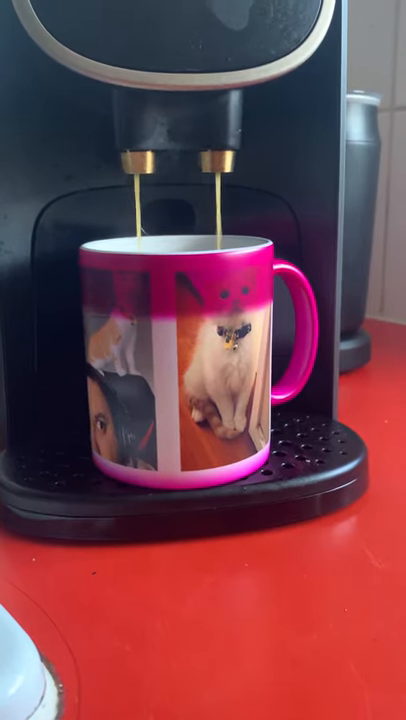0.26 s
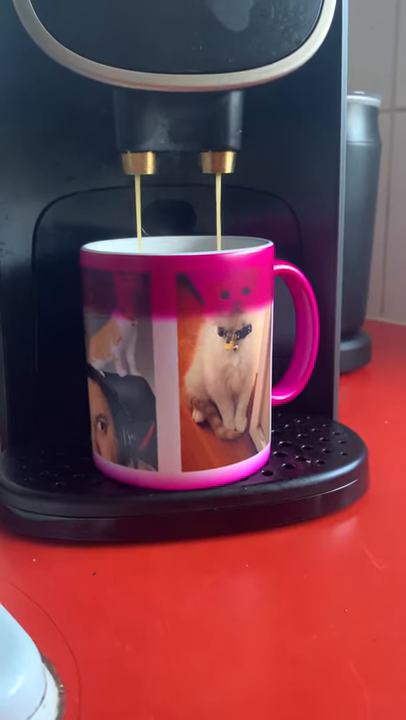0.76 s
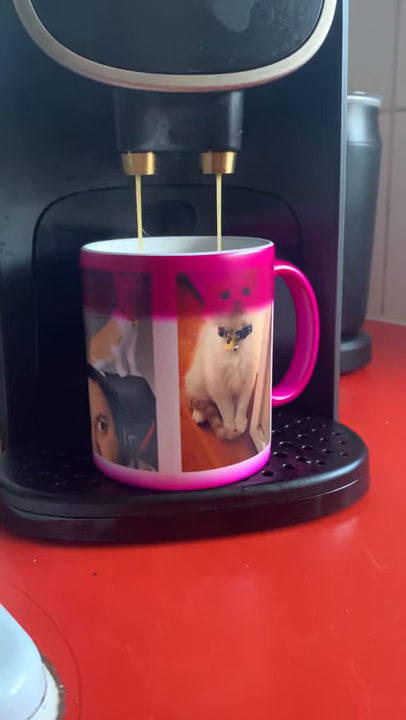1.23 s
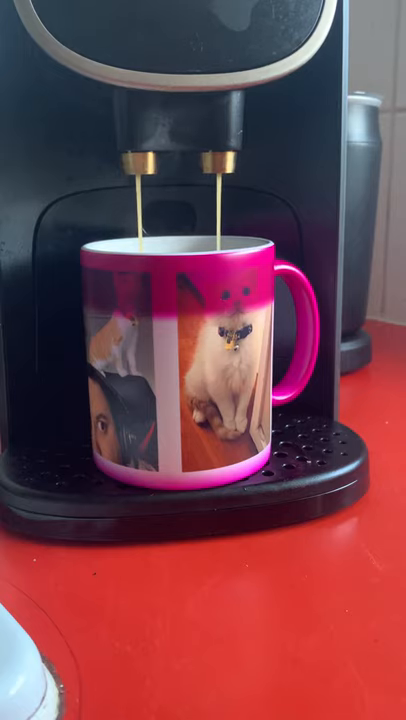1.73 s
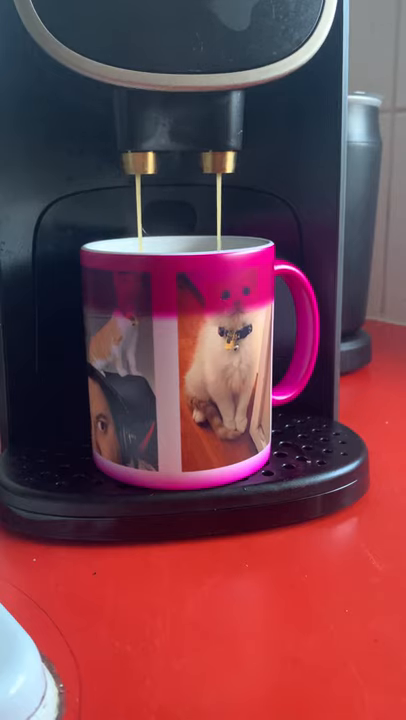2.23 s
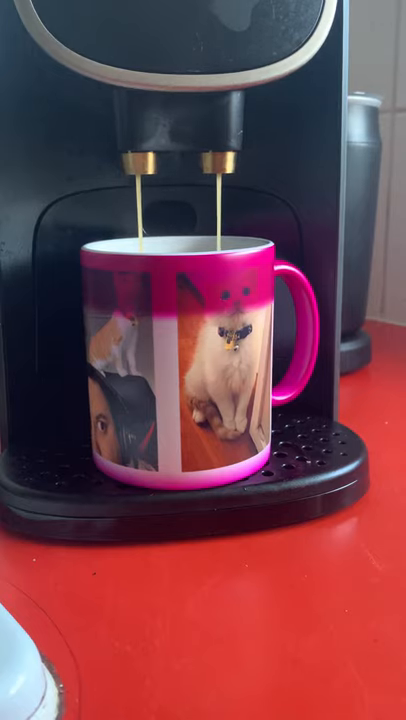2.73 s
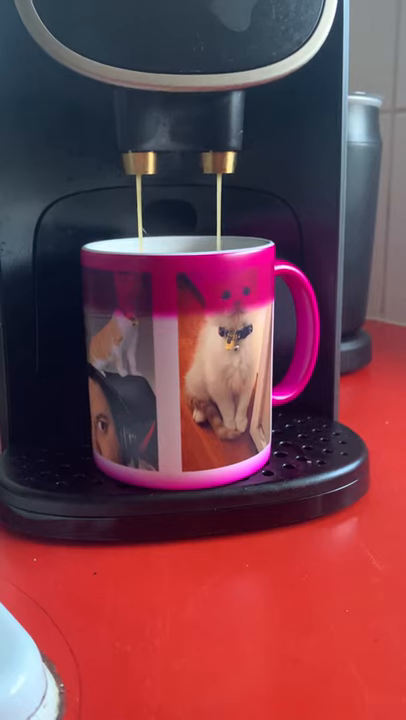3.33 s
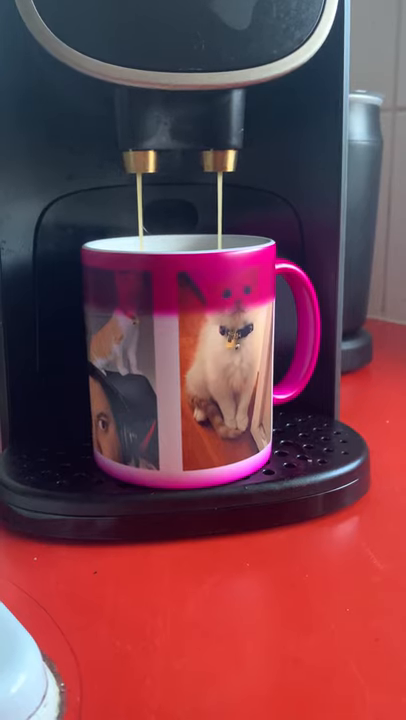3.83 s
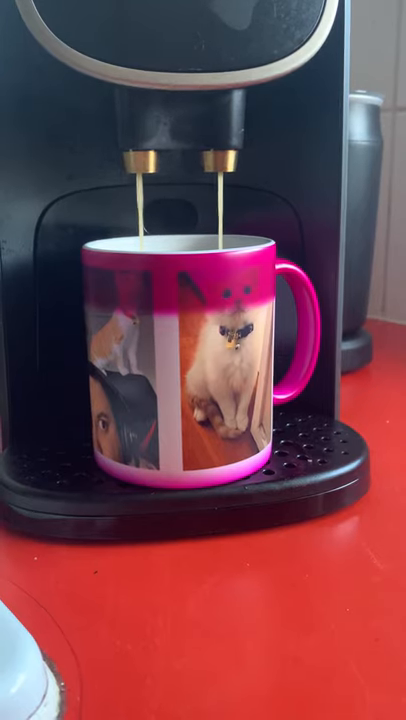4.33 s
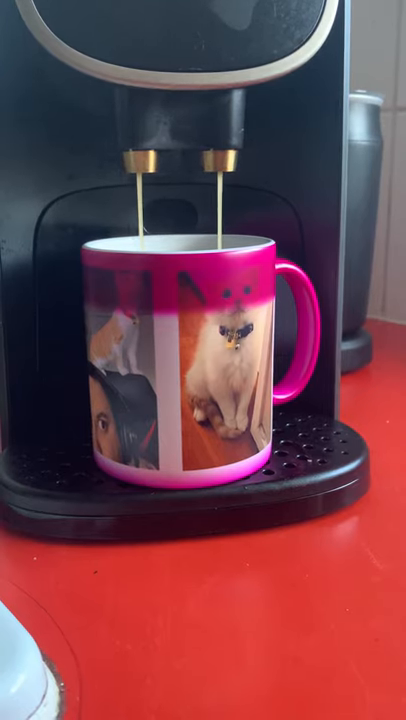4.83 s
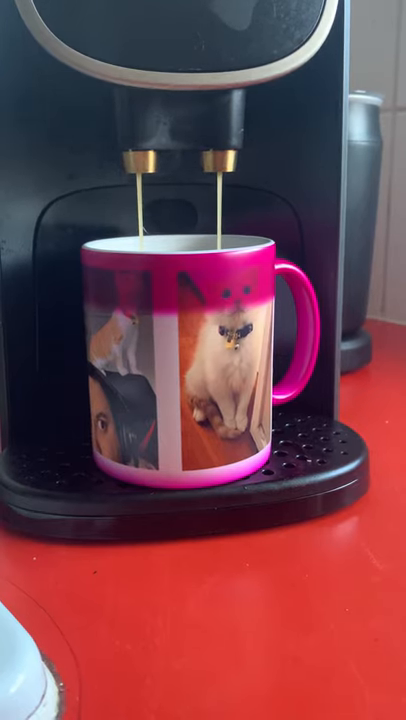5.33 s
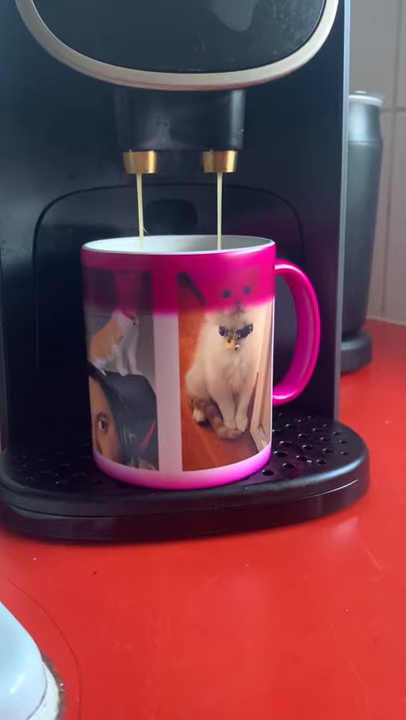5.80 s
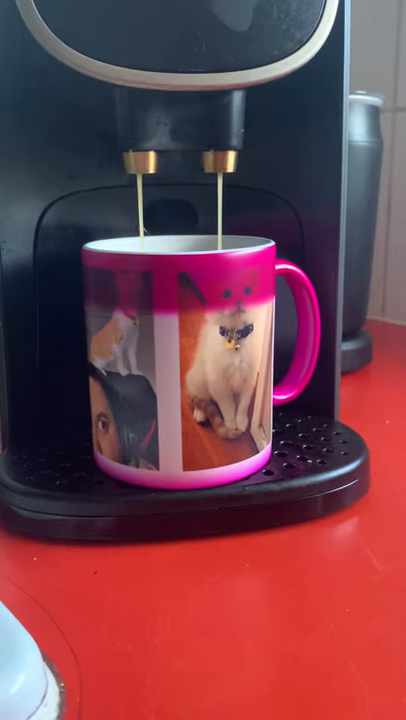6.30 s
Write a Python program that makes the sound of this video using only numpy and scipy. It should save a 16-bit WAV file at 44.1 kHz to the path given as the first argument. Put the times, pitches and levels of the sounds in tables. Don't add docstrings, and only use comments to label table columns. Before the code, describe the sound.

A coffee machine's vibrating pump hums and buzzes steadily with sharp rapid clacking, later rattling its drip tray, while coffee trickles into a mug.

```python
import sys
import numpy as np
from scipy import signal
from scipy.fft import rfft, irfft, next_fast_len
from scipy.io import wavfile
from scipy.ndimage import map_coordinates

SR = 44100
rng = np.random.default_rng(int(sys.argv[2]) if len(sys.argv) > 2 else 0)


def ratio_of_db(decibels):
    return 10 ** (np.asarray(decibels, float) / 20)


def wav_out(sig):
    wavfile.write(sys.argv[1], SR, np.round(np.clip(np.atleast_2d(sig).T, -1, 1) * 32767).astype(np.int16))


N = 289296
TIME = np.arange(N) / SR
MAINS_HZ = 49.963
SIDES = np.array([[1], [-1]])
BOUNCE_FROM_S = 3.97


def unit(x):
    return x / np.sqrt(np.mean(x ** 2) + 1e-20)


def along(points, hz):
    f, v = np.transpose(points)
    return np.interp(np.log(hz + 1), np.log(f + 1), v)


def wobble(rate):
    knots = rng.standard_normal(int(N * rate / SR) + 4)
    return map_coordinates(knots, [TIME * rate])


def shape(start, attack, hold, release):
    end = start + attack + hold + release
    return np.clip(np.minimum((TIME - start) / attack, (end - TIME) / release), 0, 1)


def filtered(x, response):
    m = 2 * next_fast_len(N // 2 + SR // 4)
    return irfft(rfft(x, m) * response(np.fft.rfftfreq(m, 1 / SR)), m)[..., :N]


def causal(gain):
    c = irfft(np.log(gain + 1e-6))
    half = len(c) // 2
    return np.exp(rfft(np.r_[c[0], 2 * c[1:half], c[half], np.zeros(half - 1)]))


def ringing(modes, f):
    return np.sqrt(sum(ratio_of_db(2 * db) / (1 + (2 * (f - c) / w) ** 2) ** 2 for c, w, db in modes))


def strokes(start, sizes, jitter):
    n = np.arange(-2, int(N / SR * MAINS_HZ) + 1)
    at = (start + n / MAINS_HZ + jitter * rng.standard_normal(len(n))) * SR
    keep = (at >= 0) & (at < N - 1)
    at, size = at[keep], sizes(n)[keep]
    whole = at.astype(int)
    part = at - whole
    return np.bincount(whole, size * (1 - part), N) + np.bincount(whole + 1, size * part, N)


def scatter(db):
    return lambda n: ratio_of_db(db * rng.standard_normal(len(n)))


def ports(f):
    # frequency in Hz, lead of the left port in radians
    port_lead = [(900, 0.71), (1100, 3), (1500, 0.69), (1950, 1.1), (2200, 1.944), (3100, 2.36),
                 (3450, 2.04), (4000, 1.22), (4800, 2.35), (6500, 4.87), (7500, 6), (9500, 6.99),
                 (12500, 9.62), (14100, 10), (14700, 11.9), (15500, 11)]
    return np.exp(.5j * SIDES * along(port_lead, f))


def kitchen():
    # time in seconds, pitch in Hz
    engine_pitch = [
        (0, 58.5),
        (1.6, 55.5),
        (3.0, 51.2),
        (5.45, 50.5),
        (5.63, 56),
        (6.56, 55.8),
    ]
    # start in seconds, length in seconds, level in dB
    swells = [
        (.05, 0.9, -52),
        (1.05, 1, -48.5),
        (2.27, 0.22, -52),
        (2.65, .29, -51),
        (3.122, .33, -68),
        (3.62, 0.35, -59),
        (4.15, .18, -64),
        (5.47, 1, -57),
        (6.45, .2, -63),
    ]
    # frequency in Hz, density in dB per Hz
    hiss_spectrum = [(30, -11), (100, -7), (300, -11), (600, -23), (1500, -20), (3000, -22.5),
                     (6000, -20.5), (13000, -30.5), (16000, -31.5)]
    edge_s, lull_db = 0.085, -78
    drone_hz = np.interp(TIME, *np.transpose(engine_pitch))
    heard = ratio_of_db(lull_db)
    for start, length, db in swells:
        heard = heard + ratio_of_db(db) * shape(start - edge_s / 2, edge_s, length - edge_s, edge_s)
    drone = np.sin(2 * np.pi * np.cumsum(drone_hz) / SR) * ratio_of_db(1.3 * wobble(4.2))
    alike, opposite = rng.standard_normal((2, N))
    opposite = filtered(opposite, lambda f: np.clip(f / 400, .05, 1))
    hiss = np.array([alike + opposite, alike - opposite])
    hiss = filtered(hiss, lambda f: ratio_of_db(along(hiss_spectrum, f)))
    return ratio_of_db(-4.0) * heard * unit(drone) + ratio_of_db(-50.5 + 1.37 * wobble(6)) * unit(hiss)


def panel(level_db):
    mode = lambda f: causal(ringing([(1491.5, 46.3, 0.025)], f)) * ports(f)
    return ratio_of_db(level_db + 1.5) * unit(filtered(strokes(0.014, scatter(0.57), jitter=2.5e-5), mode))


def tray(level_db):
    # frequency in Hz, width in Hz, level in dB
    tray_modes = [(78, 48, 0.5), (115, 55, -6), (210.3, 43, 7), (295, 36, 7), (251, 50, -1.5),
                  (425, 88, -12.5), (678, 36, -7), (821, 95, -8)]
    slip = np.cumsum(.02 * rng.standard_normal(400))
    sizes = lambda n: np.cos(2 * np.pi * (n / 3 + slip[n + 2])) + .1 * rng.standard_normal(len(n))
    response = lambda f: causal(ringing(tray_modes, f)) * np.exp(-.3j * SIDES)
    knock = filtered(strokes(0.003944, sizes, jitter=0.00023), response)
    return ratio_of_db(level_db - 5.0) * unit(knock)


def clack(level_db):
    # frequency in Hz, width in Hz, level in dB at first, midway and at the end
    casing = [(1750, 140, -16, -6.5, -2), (1920, 77, -7, -12.5, -11), (2567, 130, -0.5, 2.5, 2),
              (2810, 140, 1.5, -1, -2), (3485, 154, 0.5, -2, -5.5), (3986, 145, 5, 4.5, 3.5),
              (4470, 162, 5.5, -2.5, 8.5), (4840, 130, 1, -7, -8), (5137, 330, 1, 3.5, 3),
              (5630, 100, 10, -10, 7), (6120, 91, 0, 0.5, -5.5), (6370, 120, -2, -10, -8),
              (6650, 126, 3, 0, 1.5), (9030, 400, -13, -4.5, -12), (10360, 120, -22, -10.5, 0),
              (11040, 460, -23, -3.5, -2), (12540, 490, -14, 1.5, -5), (13100, 240, -7, -8, -1.5),
              (15200, 400, -15, -11.5, -13.5)]
    # frequency in Hz, level in dB
    shell = [(800, -42), (1100, -16.5), (1900, -22), (2170, -17.5), (2500, -31), (3000, -16), (3200, -22.5),
             (3600, -8), (7000, -10.5), (7500, -10.5), (11000, -8), (13500, -9.5), (14100, -21),
             (15500, -20), (16000, -46.5)]
    # frequency in Hz, level in dB
    crisp = [(1000, 5), (3000, -0.5), (6000, -3), (9000, -1), (15000, 2)]
    # frequency in Hz, delay in seconds
    casing_lag = [(1000, .004), (1800, .0025), (2600, .0005), (3700, .001), (5000, -.0005), (7000, .0015),
                  (12000, .002)]
    hit = strokes(.013, scatter(0.89), jitter=1.2e-5)
    rebound = strokes(.0156, scatter(0.81), jitter=2e-5)
    blow = unit(hit + 0.74 * rebound)
    knots = rng.standard_normal(200)
    lag = lambda f: along(casing_lag, f) + 0.0008 * map_coordinates(knots, [f / 250])
    paths = lambda f: np.exp(-2j * np.pi * np.cumsum(lag(f)) * f[1])

    t = np.arange(SR // 20) / SR
    decay = ratio_of_db(-60 * t / 0.036) + 0.39 * ratio_of_db(-60 * t / 0.4)
    swell = (1 - np.exp(-t / 0.0071)) ** 2 * decay
    gate = signal.fftconvolve(strokes(0.013, scatter(2.1), jitter=0.00053), swell)[:N]
    shared, left, right = rng.standard_normal((3, N))
    rattle = unit(gate * (shared + 0.32 * np.array([left, right])))

    def colour(f, col, ring):
        modes = ringing(np.array(casing)[:, [0, 1, col]], f)
        return causal(np.hypot(ring * modes, ratio_of_db(along(shell, f)))) * ports(f)

    def sound(col):
        struck = lambda f: colour(f, col, ring=1.26) * paths(f) * ratio_of_db(along(crisp, f))
        return filtered(ratio_of_db(1.5) * blow, struck) + filtered(rattle, lambda f: colour(f, col, ring=0.57))

    stage = np.interp(TIME, [.7, 2, 3.6, 5.2], [0, 1, 1, 2])
    mix = sum(np.clip(1 - abs(stage - i), 0, 1) * sound(i + 2) for i in range(3))
    return ratio_of_db(level_db + 3) * unit(mix)


def hum(level_db):
    # multiple of the mains, level in dB, left-right balance in dB,
    # lead of the left port in radians
    light_tray = [(1, -62.0, 0, -0.1), (2, -45.5, -1, -0.2), (3, -36.5, -5, -0.1), (4, -42.5, 0, -0.4),
                  (5, -51.0, -3, -2.4), (6, -45.5, 0, -1.4), (7, -66.0, -4, -0.6), (8, -55.0, -1, -1.4),
                  (9, -63.5, -8, -2.3), (10, -53.5, -7, -2.4), (11, -70.0, 2, 2.5), (12, -68.5, 0, 3.1),
                  (13, -62.5, -3, -2.9), (14, -64.0, -5, 2.7), (15, -54.5, -7, 2.2), (16, -60.0, -1, -0.7),
                  (17, -63.0, -2, -0.1), (18, -73.0, 0, 0.3), (19, -69.5, -2, 1.5), (20, -67.5, 0, 2.8),
                  (21, -70.5, 0, 3.1), (22, -68.5, -9, 2.1), (23, -80.5, 2, 2.6), (24, -70.5, 3, 1.7),
                  (25, -75.0, 5, 2.1), (26, -65.0, -9, 2.6), (27, -67.0, -6, 2.2), (28, -73.0, 1, 2.1)]
    loaded_tray = [(1, -63.0, -1, -0.1), (2, -44.0, -1, -0.2), (3, -35.5, -5, -0.1), (4, -41.0, 1, -0.4),
                   (5, -48.0, 0, -1.4), (6, -46.0, -1, -1.4), (7, -67.0, -3, -1.8), (8, -55.5, -1, -1.4),
                   (9, -61.5, -6, -2.7), (10, -56.0, -7, -2.5), (11, -68.0, -6, 2.6), (12, -71.0, 0, -3.0),
                   (13, -63.5, -2, -3.1), (14, -70.5, -5, 0.5), (15, -54.5, -6, 2.1), (16, -60.0, -2, -1.7),
                   (17, -57.5, -4, 0.8), (18, -74.0, -10, 1.9), (19, -70.0, -5, 1.0), (20, -65.5, 0, 2.4),
                   (21, -78.5, -6, 2.1), (22, -65.5, -1, 2.5), (23, -76.5, 2, 2.3), (24, -69.0, 0, 1.7),
                   (25, -77.0, -12, -1.6), (26, -76.5, -3, -2.0), (27, -77.5, -7, 2.2), (28, -73.0, 0, 2.1)]
    opposed = [5, 7, 8, 9, 11, 15, 16]
    k, loaded_db, _, loaded_lead = np.transpose(loaded_tray)
    hz = k * MAINS_HZ
    edge = lambda f: np.interp(f, [0, hz[0], hz[-1], hz[-1] + MAINS_HZ], [-30, 0, 0, -40])
    flips = lambda f: np.exp(1j * np.pi * np.interp(f, hz, np.isin(k, opposed)))
    gain = lambda f: ratio_of_db(np.interp(f, hz, loaded_db - loaded_db[2]) + edge(f))
    push = -strokes(0.00247, scatter(0.14), jitter=1e-5) * SR / MAINS_HZ / np.sqrt(2)
    push = filtered(push, lambda f: causal(gain(f)) * flips(f))

    def state(table):
        _, db, pan_db, lead = np.transpose(table)
        lead = np.unwrap(loaded_lead) + np.angle(np.exp(1j * (lead - loaded_lead)))
        level = lambda f: np.interp(f, hz, db - db[2] - loaded_db + loaded_db[2])
        balance = lambda f: SIDES * np.interp(f, hz, pan_db) / 2
        phase = lambda f: np.exp(.5j * SIDES * np.interp(f, hz, lead))
        return filtered(push, lambda f: ratio_of_db(level(f) + balance(f)) * phase(f))

    creep_share = 0.56
    load = creep_share * shape(0.23, 3, 10, 1) + (1 - creep_share) * shape(BOUNCE_FROM_S, 0.5, 10, 1)
    return ratio_of_db(level_db + 1.06) * ((1 - load) * state(light_tray) + load * state(loaded_tray))


def damped(x):
    # start, attack, hold and release in seconds
    pressed = (1.2, 0.89, 2.2, 0.59)
    note = filtered(x, lambda f: ringing([(284, 77, 0)], f))
    return x - 0.26 * shape(*pressed) * note


def scene():
    # start, attack, hold and release in seconds
    panel_tuning = (0.93, 0.74, 3.6, 1.2)
    # frequency in Hz, width in Hz, depth from 0 to 1
    nulls = [(2135, 90, .6), (3065, 110, .8)]
    hum_db = -36.5 - 2.5 * np.exp(-TIME / 0.81)
    panel_db, panel_off_db, sag_db_per_s = -56, -69.5, 1.4
    sag_db = sag_db_per_s * np.clip(TIME - sum(panel_tuning[:2]), 0, None)
    ring_db = panel_off_db + shape(*panel_tuning) * (panel_db - panel_off_db - sag_db)
    bounce_db, bounce_rise_s = -46.5, .06
    loose = np.clip((TIME - BOUNCE_FROM_S) / bounce_rise_s, 0, 1)
    resting_db = -61 + 4 * wobble(3.9)
    tray_db = loose * bounce_db + (1 - loose) * resting_db
    pump = damped(hum(hum_db)) + clack(-47 + .5 * wobble(6)) + panel(ring_db)
    counter = lambda f: 1 - sum(depth * ringing([(hz, width, 0)], f) for hz, width, depth in nulls)
    return filtered(pump + tray(tray_db) + kitchen(), counter)


def thinned(x, margin_db):
    band_edges = np.r_[0, 96:144:12, 144, 160, 176, 196, 216, 240, 264, 292, 320:1024:32]
    # start in seconds, length in seconds, share of frames spared
    spare_spells = [
        (0, .92, .35),
        (1.38, .9, .22),
        (2.87, .26, .45),
        (3.72, .93, .42),
        (5.1, .85, .28),
    ]
    lead = 1024 - 726
    both = np.pad([x[0] + x[1], x[0] - x[1]], ((0, 0), (lead, 0))) / 2
    hz, t, z = signal.stft(both, SR, nperseg=2048)
    band = np.searchsorted(band_edges, np.arange(len(hz)), "right") - 1
    power = np.add.reduceat(abs(z) ** 2, band_edges, axis=1) + 1e-20
    margin = margin_db + 1.8 * rng.standard_normal(power.shape[1:])
    weak = power < power[::-1] * ratio_of_db(2 * margin)
    spared = .06 + sum(share * (t > s) * (t < s + length) for s, length, share in spare_spells)
    hungry = rng.random(len(t)) > spared
    keep = 1 - (weak & hungry)[:, band] * (hz > 2070)[:, None]
    mid, side = signal.istft(z * keep, SR, nperseg=2048)[1][:, lead:lead + N]
    return np.array([mid + side, mid - side])


def top_cut(x):
    return signal.sosfilt(signal.butter(12, 17030, fs=SR, output="sos"), x)


def record(dry):
    kept = filtered(dry, lambda hz: hz < 15830)
    return top_cut(thinned(kept, margin_db=-6.5))


dry = scene()
out = record(dry)
wav_out(out)
```